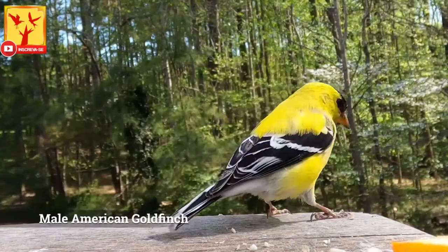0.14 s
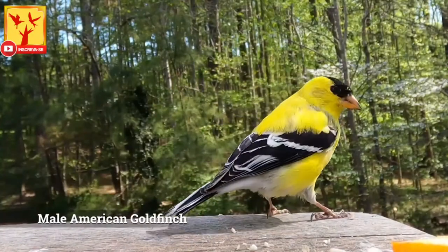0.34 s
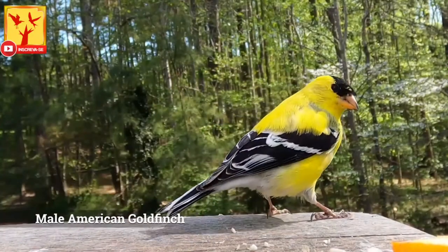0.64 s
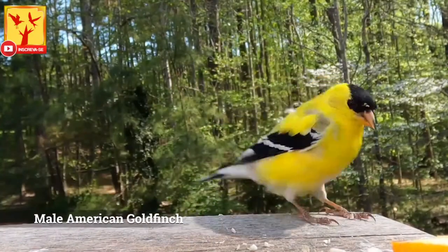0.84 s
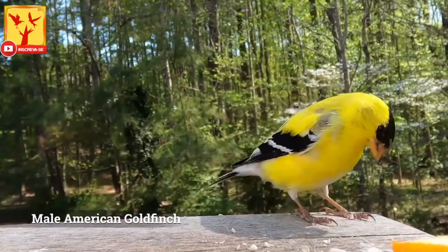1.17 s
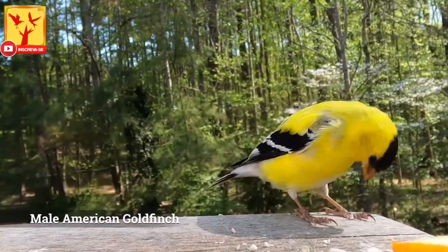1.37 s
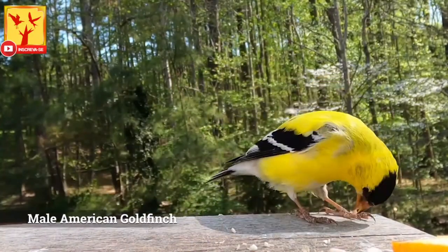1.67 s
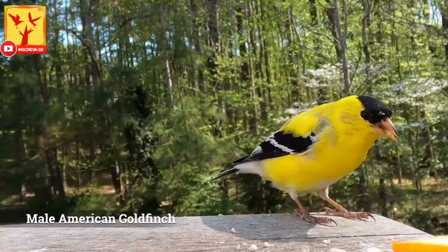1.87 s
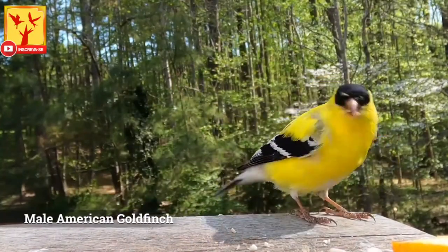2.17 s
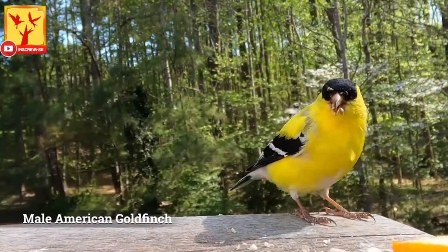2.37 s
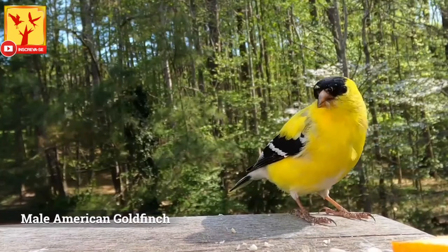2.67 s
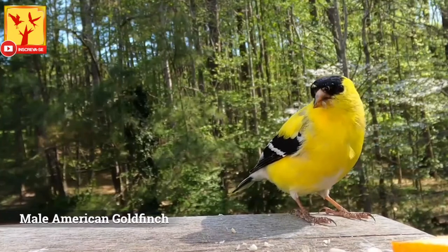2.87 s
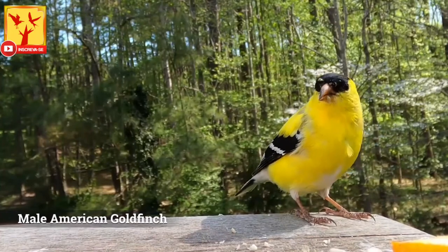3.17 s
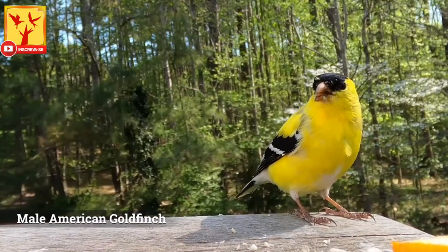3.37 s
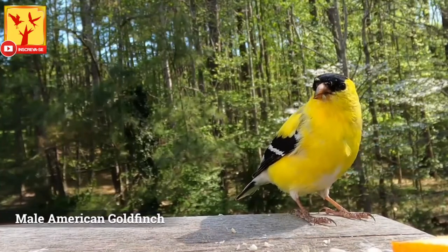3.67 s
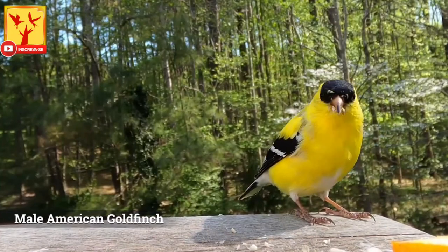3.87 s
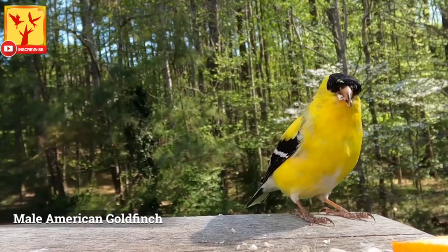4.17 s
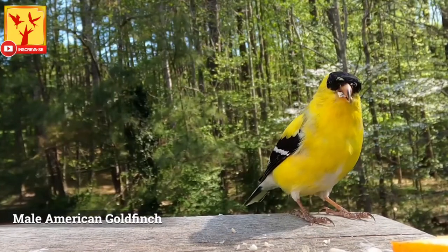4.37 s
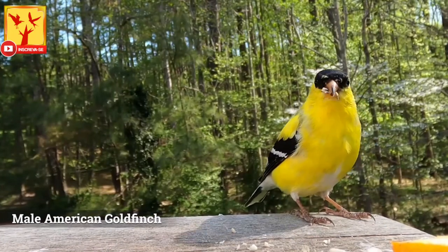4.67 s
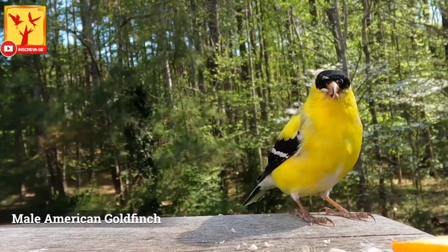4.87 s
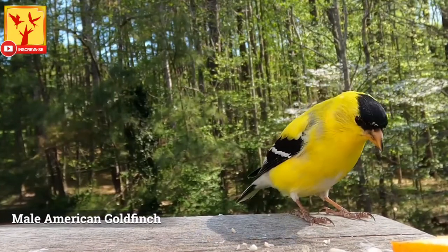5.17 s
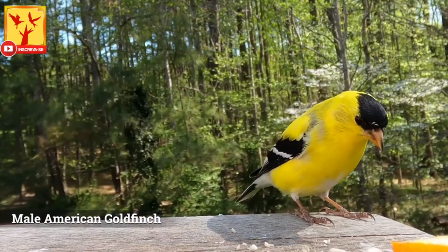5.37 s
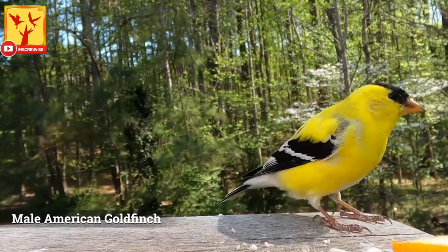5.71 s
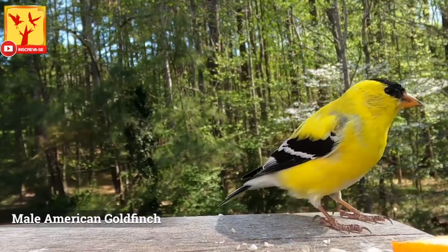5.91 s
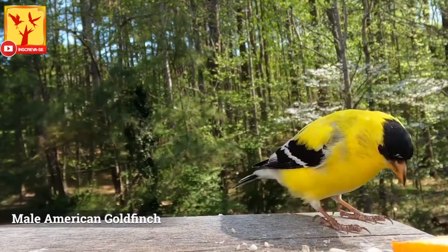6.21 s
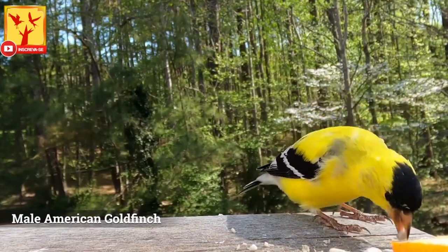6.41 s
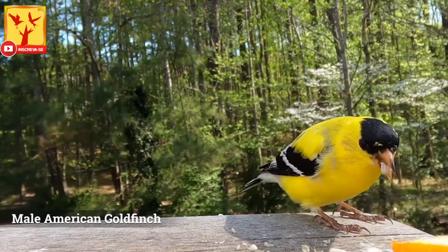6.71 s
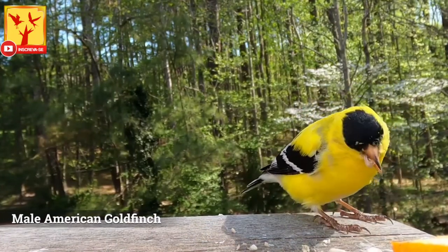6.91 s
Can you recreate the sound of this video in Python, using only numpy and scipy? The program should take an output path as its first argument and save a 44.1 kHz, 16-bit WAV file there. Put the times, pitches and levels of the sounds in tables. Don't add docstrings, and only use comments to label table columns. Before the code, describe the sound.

A quiet outdoor bed of low rumble, distant road and soft leaf hiss, nearly mono at first. Small dry claw taps fall near 0, 0.3 and 0.4 s, with a stronger one at 1 s. Thin, wavering high whistles come from the woods from 0.3 to 1.2 s as a faint tyre hum passes, nearest around 1 s. Low whistles climb at 1.7 and 2.5 s while stereo opens. Hollow wooden knocks sound at 2.6 and 2.8 s; the breeze freshens at 3 s and a low engine drone strengthens unevenly. Taps cluster at 3.1 and 3.45 s with rasping calls. At 3.7 s a buzz falls into a rapid trill until 4.3 s, with wing-beat thumps strongest at 4.2 s, left-heavy, and a brief squeak. A pure slur rises at 4.6 s, a sharp left chip at 5.1 s. Knocks at 5.7 s, light taps and faint rasps end near 7 s over the drone.

```python
import sys
import numpy as np
from scipy import signal
from scipy.fft import rfft, irfft, next_fast_len
from scipy.io import wavfile
from scipy.ndimage import uniform_filter1d, map_coordinates

SR = 44100
rng = np.random.default_rng(int(sys.argv[2]) if len(sys.argv) > 2 else 0)


def store_wav(level_fs):
    pcm = np.round(np.clip(np.atleast_2d(level_fs), -1, 1) * 32767)
    wavfile.write(sys.argv[1], SR, pcm.T.astype(np.int16))


def decibels_to_gain(level_db):
    exponent = np.asarray(level_db, float) / 20
    return 10 ** exponent


N = 310905
TIME = np.arange(N) / SR
FRESHENED = TIME > 2.98


def unit(x):
    return x / np.sqrt(np.mean(x ** 2) + 1e-20)


def along(points, hz):
    f, v = np.transpose(points)
    return np.interp(np.log(hz + 1), np.log(f + 1), v)


def curves(rows):
    s, *cols = np.transpose(rows)
    return [np.interp(TIME, s, c) for c in cols]


def gate(rows, edge_s):
    return np.clip(np.minimum(TIME - rows[0][0], rows[-1][0] - TIME) / edge_s, 0, 1)


def wobble(rate):
    knots = rng.standard_normal(int(N * rate / SR) + 4)
    return map_coordinates(knots, [TIME * rate])


def tone(hz):
    return np.sqrt(2) * np.sin(2 * np.pi * np.cumsum(hz) / SR)


def sides(pan_db):
    pair = decibels_to_gain(np.array([[pan_db / 2], [-pan_db / 2]]))
    return pair / pair.mean()


def filtered(x, response):
    m = next_fast_len(N + SR // 2)
    return irfft(rfft(x, m) * response(np.fft.rfftfreq(m, 1 / SR)), m)[..., :N]


def rush(spectrum, alike, patchy_db):
    z = signal.stft(rng.standard_normal((2, N)), nperseg=512)[2]
    field = uniform_filter1d(rng.standard_normal(z.shape[1:]), size=6, axis=0)
    field = uniform_filter1d(field, size=14, axis=1)
    pair = signal.istft(z * decibels_to_gain(patchy_db * unit(field)), nperseg=512)[1][:, :N]

    def shares(hz):
        turn = np.arccos(np.clip(along(alike, hz), -1, 1)) / 2
        return decibels_to_gain(along(spectrum, hz)) * [np.cos(turn), np.sin(turn)]

    mid, side = filtered(pair, shares)
    return unit(np.array([mid + side, mid - side]))


def flutter(rows, rate_hz, rough, lean_hz=150):
    hz, db, swing = curves(rows)
    beat = tone(rate_hz * (1 + rough * wobble(40))) / np.sqrt(2)
    swing = swing * (1 + 3 * rough * wobble(150))
    return gate(rows, 0.0023) * decibels_to_gain(db - swing / lean_hz * beat) * tone(hz + swing * beat)


def slur(s, length, start_hz, end_hz, bend, overtone_db, rough_db, late):
    u = np.clip((TIME - s) / length, 0, 1)
    hz = end_hz + (start_hz - end_hz) * (1 - u) ** bend
    overtone = decibels_to_gain(overtone_db + 2.5 * rough_db * wobble(300)) * tone(2 * hz)
    arch = np.sin(np.pi * u ** late) ** .7
    return arch * (decibels_to_gain(rough_db * wobble(900)) * tone(hz) + overtone)


def wood(x):
    # (frequency [Hz], time to fall 60 dB [s])
    decay = [(1500, 1.3), (4000, 1.01), (8000, 0.23)]
    hz, t, z = signal.stft(rng.standard_normal((2, SR)), SR, nperseg=256)
    tail = signal.istft(z * decibels_to_gain(-60 * t / along(decay, hz)[:, None]), SR, nperseg=256)[1]
    tail = tail + .3 * tail[::-1]
    return signal.fftconvolve(x[None], tail / np.linalg.norm(tail[0]), axes=1)[:, :N]


def taps():
    # (time [s], peak [dB], knock [dB], left minus right [dB])
    contacts = [(0.0177, -54, 13, -6), (0.255, -55, 14, -12), (0.4046, -60, 2, -8.5), (1.027, -44, 11.5, 3),
                (1.8796, -60.5, 12, -11), (2.213, -56, 1, 12), (2.586, -68, 24, 3), (2.794, -50, -7, 6),
                (3.0385, -57, 10, -9), (3.048, -47.5, -2, 11), (3.114, -41.5, 3.5, 19),
                (3.1238, -45, 10, 2), (3.1419, -49, 9, 15), (3.597, -63, 23.5, 2), (3.4324, -48.5, 17, 5),
                (3.454, -44, 17, 12), (3.463, -52, 17.5, 4), (3.517, -55, -11, 6), (3.860, -52, -18.5, 1),
                (4.006, -47.5, 6, 14), (4.0247, -45, 5.5, 9.5), (4.065, -48.5, 3.5, 18), (4.107, -51, 0, 8),
                (4.779, -57, 2, 2.5), (5.7158, -48.5, 10, 0), (5.736, -52.5, 14, 7), (6.64, -63, 5, 2),
                (6.764, -50.5, -27, 10), (6.8794, -62, -3, 18), (1.752, -66, 0, 2), (2.185, -66, 0, 2),
                (3.2475, -64, 0, 4), (3.2745, -60, -1, 2), (4.717, -64, 0, 3), (4.845, -62, 0.5, 1),
                (4.9097, -63, 0, 3), (5.085, -51, -1, 11), (5.3428, -61, 1, 1), (6.759, -57, -12, 8)]
    # (frequency [Hz], level [dB per Hz])
    crack_spectrum = [(800, -40), (1800, -8), (3600, 0), (4500, -5), (8000, -14), (9500, -29), (12500, -42),
                      (15000, -70)]
    # (frequency [Hz], width [Hz], level [dB])
    rail_modes = [(430, 91, -11.5), (798, 91, 1.5), (1054, 90, -3.5), (1470, 130, -5)]
    rise_s = 0.0032
    crack, knock = np.zeros((2, N + SR)), np.zeros(N + SR)
    t = np.arange(SR // 10) / SR
    u = t / rise_s
    for s, db, knock_db, pan_db in contacts:
        burst = decibels_to_gain(db + 6.0) * u * np.exp(-u) * rng.standard_normal((2, len(t)))
        scuff = burst[0] + 0.2 * burst[1] * [[1], [-1]]
        crack[:, round(s * SR):][:, :len(t)] += scuff * sides(pan_db)
        knock[round(s * SR):][:len(t)] += decibels_to_gain(knock_db) * burst[1]

    def rail(f):
        total = 0
        for k, (centre, width, db) in enumerate(rail_modes):
            damping = 1j * f * width
            total = total + (-1) ** k * decibels_to_gain(db) * damping / (centre * centre - f * f + damping)
        return total / (1 + 1j * f / 2500) ** 3

    scuffs = filtered(crack[:, :N], lambda hz: decibels_to_gain(along(crack_spectrum, hz)))
    return decibels_to_gain(5.5) * scuffs + decibels_to_gain(13.5) * filtered(knock[:N], rail) * sides(pan_db=-17.0)


def knocks():
    # (time [s], peak [dB], pitch [Hz], time to fall 60 dB [s])
    blows = [(2.5867, -42, 1330, 0.036), (2.587, -42.5, 410, 0.072), (2.821, -45.5, 1500, .03),
             (3.455, -43, 810, 0.066), (5.718, -50.5, 760, 0.056), (5.739, -48.5, 420, .05),
             (1.03, -50, 1100, .05), (4.3, -51, 2600, 0.054), (5.716, -59.5, 2050, .03),
             (2.4, -54, 2600, .02), (2.8, -53, 4000, 0.028)]
    out = 0
    for s, db, hz, t60 in blows:
        decay = decibels_to_gain(db - 60 * np.clip(TIME - s, 0, None) / t60) * (TIME > s)
        out = out + decay * np.sin(2 * np.pi * hz * (s - TIME))
    return out


def puffs():
    # (time [s], left level [dB], pitch
    # [Hz], right level [dB])
    eddies = [(4.021, -16, 64.6, -18.5), (4.054, -25, 110, -30), (4.065, -20.5, 72, -23),
              (4.054, -31.5, 290, -36), (4.093, -30.5, 238, -34), (4.103, -22.5, 90.5, -22),
              (4.134, -31, 239, -33.5), (4.146, -18, 60, -25.5), (4.160, -23, 266, -19),
              (4.167, -12, 105, -26), (4.159, -7, 96, -26), (4.171, -12.5, 156, -17),
              (4.185, -13.5, 98, -23), (4.195, -14, 250, -14.5), (4.2, -26, 300, -19),
              (4.204, -15, 146, -16), (4.22, -18, 134, -42), (4.221, -31.5, 257, -26),
              (4.21, -23.5, 48, -30), (4.226, -27, 65, -25), (4.244, -18, 69.7, -25), (4.282, -22, 60, -36),
              (2.592, -38, 330, -43), (3.595, -37, 330, -39), (6.3, -23, 40.6, -49)]
    out = 0
    for s, left_db, hz, right_db in eddies:
        u = np.clip((TIME - s) * hz / 1.41, 0, 1)
        lag = 1.5 * (s > 4.14)
        push = np.sin(2.6 * np.pi * u - [[0], [lag]]) + .06 * np.sin(7.5 * np.pi * u)
        out = out + decibels_to_gain([[left_db], [right_db]]) * np.sin(np.pi * u) ** 2 * push
    return out


def chips():
    # (time [s], start [Hz], end [Hz], level [dB])
    falls = [
        (2.788, 8900, 7680, -61),
        (3.591, 9330, 8010, -55),
        (5.069, 9400, 7630, -37),
    ]
    nearest_db = -36.5
    out = 0
    for s, start_hz, end_hz, db in falls:
        note = slur(s, 0.028, start_hz, end_hz, bend=3.3, overtone_db=-25, rough_db=1.5, late=1.97)
        note = decibels_to_gain(db) * note
        near_echo = decibels_to_gain(-24) * np.roll(note, round(0.023 * SR))
        far_db = nearest_db - db
        wet = decibels_to_gain(-23 + 0.74 * far_db) * wood(note)
        out = out + (note + near_echo + wet) * sides(29 - .45 * far_db)
    return out


def singer():
    # (time [s], centre [Hz], level [dB], swing [Hz])
    buzz = [
        (3.69, 5540, -68.5, 1),
        (3.715, 5520, -54.5, 4.2),
        (3.732, 5580, -41.5, 50),
        (3.76, 5540, -41, 490),
        (3.775, 5627, -43, 550),
        (3.795, 5150, -41.5, 550),
        (3.82, 4580, -39, 440),
        (3.843, 3950, -37, 200),
        (3.856, 3360, -34, 20),
        (3.864, 3040, -44, 10),
    ]
    song = flutter(buzz, rate_hz=193, rough=0.061, lean_hz=250) + trill()
    effort = np.sqrt(abs(uniform_filter1d(song * song, size=300)))
    octave = decibels_to_gain(-44.5) * song * song / (effort + 1e-4)
    hiss = decibels_to_gain(-43.0 + 4 * wobble(27)) * effort * rng.standard_normal(N)
    return song + filtered(octave + hiss, lambda hz: hz > 7200)


def trill():
    # (time [s], level [dB])
    effort = [
        (3.85, -43.5),
        (3.875, -30.5),
        (4.19, -35.5),
        (4.275, -43.5),
        (4.3, -51),
    ]
    strokes_db = [0, 0.5, -0.5, 0.5, 0.5, 0.5, 2.5, -1, -0.5, 4, -1.5, -3, -3, 1, -2.5, -3, -1, -4.5]
    # (time [s], level [dB])
    low_fade = [
        (4.1, 0.5),
        (4.2, -7.5),
    ]
    k = np.arange(18)
    gaps_s = np.minimum(.022 + .001 * k, .0272)
    s = 3.852 + np.cumsum(gaps_s * (k > 0))
    size_db = np.interp(TIME, s, strokes_db)
    turn = np.interp(TIME, s, k) % 1
    unsteady = wobble(150)
    hz = np.interp(turn, [0, .2, .48, .56, .8, 1], [4370, 3620, 3260, 3720, 4000, 4370]) + 25 * unsteady
    stroke_db = np.interp(turn, [0, .17, .36, .53, .63, .8, 1], [-11, -15, -4.5, -18, -6, 0, -11])
    stroke_db = stroke_db + 1.2 * unsteady + curves(low_fade)[0] * (hz < 3600)
    level_db = curves(effort)[0] + size_db + uniform_filter1d(stroke_db, size=70)
    return gate(effort, 0.0072) * decibels_to_gain(level_db) * tone(uniform_filter1d(hz, size=70))


def slurs():
    # (time [s], length [s], start [Hz], end [Hz])
    squeak = (4.137, .038, 1175, 860)
    # (order [1], level [dB], lateness [1])
    orders = [(3, -43, 0.42), (4, -41.5, 1.9), (6, -53.5, 1.1), (7, -64, 1.3), (8, -68, .7), (9, -73, 1.3)]
    # (frequency [Hz], half width [Hz], gain [dB])
    throat = (3950, 260, 9.9)
    # (time [s], length [s], start [Hz], end [Hz])
    rise = (4.568, .061, 2560, 3760)
    s, length, start_hz, end_hz = squeak
    fall = 0
    for k, db, late in orders:
        fall = fall + decibels_to_gain(db) * slur(s, length, k * start_hz, k * end_hz, bend=0.99,
                                     overtone_db=-67.5, rough_db=3.5, late=late)
    centre, width, gain_db = throat
    fall = filtered(fall, lambda f: 1 + decibels_to_gain(gain_db) / (1 + ((f - centre) / width) ** 2))
    return fall + decibels_to_gain(-48) * slur(*rise, bend=.75, overtone_db=-24, rough_db=1.2, late=2.8)


def rasps():
    # (time [s], length [s], centre [Hz], level [dB], swing [Hz])
    calls = [(3.402, .185, 2730, -44.5, 320), (3.428, .042, 3600, -50, 300), (2.69, .14, 3900, -63, 400),
             (3.51, .17, 3850, -60, 350), (.67, .03, 4230, -65, 200), (3.06, .27, 3750, -62, 400),
             (2.89, .2, 2650, -63, 150), (3.72, .26, 2620, -61, 150), (4.19, .14, 2550, -63, 150),
             (6.52, .14, 6000, -68, 350), (6.85, .14, 6000, -67, 350)]
    out = 0
    for s, length, hz, db, swing_hz in calls:
        edge_db = db - 5
        rows = [(s, hz, edge_db, swing_hz), (s + .55 * length, hz, db, swing_hz),
                (s + length, hz, edge_db, swing_hz)]
        out = out + flutter(rows, rate_hz=102, rough=0.06, lean_hz=900)
    return out


def whistles(notes, flicker_db, waver_hz, blur=0.22):
    glide_power = 3.5
    out, waver = 0, waver_hz * (wobble(70) + blur * wobble(300))
    for s, length, start_hz, end_hz, db in notes:
        u = np.clip((TIME - s) / length, 0, 1)
        hz = ((1 - u) / start_hz ** glide_power + u / end_hz ** glide_power) ** (-1 / glide_power)
        arch = abs(np.sin(np.pi * u)) ** 0.28 * (u < 1)
        out = out + decibels_to_gain(db) * arch * tone(hz + waver)
    return out * decibels_to_gain(flicker_db * (wobble(40) + wobble(160)))


def far_whistles():
    # (time [s], length [s], start [Hz], end [Hz], level [dB])
    thin_notes = [(.265, .06, 4270, 4250, -70), (.325, .065, 4260, 4260, -67),
                  (.395, .095, 4270, 4210, -66), (.47, .055, 4200, 4380, -67), (.525, .06, 4240, 4300, -76),
                  (.58, .15, 4410, 4140, -63), (.72, .09, 4240, 4200, -80), (.91, .07, 4540, 4520, -68),
                  (.96, .12, 4500, 4300, -61), (1.065, .055, 4300, 4620, -61), (1.1, .08, 4600, 4720, -64),
                  (1.07, .07, 4770, 4740, -74)]
    # (time [s], length [s], start [Hz], end [Hz], level [dB])
    faint_notes = [(.36, .1, 6500, 6720, -75), (.61, .076, 7160, 7750, -75), (.86, .225, 7200, 4770, -77),
                   (.93, .16, 5600, 4740, -75), (1.55, .036, 7700, 7600, -74),
                   (1.575, .032, 7500, 7000, -70), (2.04, .098, 6200, 6170, -78),
                   (2.12, .24, 6060, 9200, -80), (2.22, .033, 4330, 4100, -71),
                   (3.06, .24, 5900, 5900, -78), (3.325, .035, 2570, 2580, -60),
                   (3.36, .098, 6900, 6460, -78), (4.598, .021, 5750, 6000, -69),
                   (5.53, .022, 3900, 3900, -66), (6.5, .37, 3460, 3580, -69)]
    # (time [s], length [s], start [Hz], end [Hz], level [dB])
    climbs = [
        (1.67, 0.17, 1650, 1800, -65.5),
        (1.84, .09, 1867, 1940, -67.5),
        (1.92, 0.099, 1940, 1927, -72.5),
        (2.5, 0.14, 1528, 1787, -64),
        (2.62, 0.1, 1756, 1880, -64.5),
        (2.7, 0.092, 1874, 1970, -62),
        (2.8, .075, 1923, 1910, -65),
    ]
    # (time [s], length [s], start [Hz],
    # end [Hz], level [dB])
    steady = [(2.47, .16, 4880, 4880, -66), (2.638, .138, 4890, 4930, -68), (2.81, .065, 4990, 4960, -67),
              (2.88, .04, 4960, 4950, -79), (2.935, .05, 4950, 4940, -80), (3.585, .1, 2790, 2770, -62),
              (3.36, .045, 2720, 2750, -62), (2.43, .032, 5600, 5700, -77), (2.975, .025, 5550, 5980, -76),
              (2.997, .065, 5960, 6050, -76), (4.572, .028, 5180, 5900, -73), (5.58, .035, 3170, 3180, -69),
              (5.655, .025, 3180, 3180, -72), (5.72, .07, 3180, 3180, -73), (6.22, .21, 2830, 2845, -73)]
    # (time [s], length [s], level [dB])
    pip_rows = [
        (0.126, 0.072, -75),
        (.222, .022, -79),
        (.285, .065, -81),
        (.43, .055, -77),
        (0.55, .035, -78),
        (.595, .03, -82),
        (.69, .045, -84),
        (.76, .08, -85),
        (.885, .06, -84),
    ]
    pips = [(s, length, 5080, 5080, db) for s, length, db in pip_rows]
    thin = whistles(thin_notes, flicker_db=3.2, waver_hz=28)
    thin = thin + whistles(climbs + steady + pips, flicker_db=2.6, waver_hz=14)
    faint = whistles(faint_notes, flicker_db=3.5, waver_hz=35, blur=1.2)
    return thin + decibels_to_gain(-15) * wood(thin) + decibels_to_gain(-7) * faint + decibels_to_gain(-14) * wood(faint)


def drone():
    # (time [s], level [dB])
    carried = [(0, -59.5), (1.53, -49), (2.26, -51.5), (2.43, -41), (2.9, -49), (3.08, -37), (3.34, -38.5),
               (3.69, -32.5), (3.95, -37.5), (4.26, -36), (4.5, -28.5), (4.8, -29), (5.25, -36.5),
               (5.48, -26), (5.85, -38), (5.96, -55.5), (6.16, -27.5), (6.4, -33)]
    db, = curves(carried)
    hz = 88.6 - 1.35 * np.clip(TIME - 2.2, 0, None) + 0.39 * wobble(2.97)
    octave = decibels_to_gain(-60.5 + 5 * FRESHENED) * wobble(22) * tone(2 * hz)
    flicker_db = 0.39 * np.clip(-40 - db, 0, 12) * wobble(8.1)
    return decibels_to_gain(db + flicker_db + 1.5 * wobble(25)) * tone(hz) + octave


def passing():
    # (time [s], level [dB])
    hum_level = [
        (.3, -85),
        (.6, -57),
        (1.0, -52.5),
        (1.5, -60.5),
        (2.0, -75),
    ]
    hum = filtered(rng.standard_normal(N), lambda f: 1 / (1 + ((f - 480) / 90) ** 2))
    return gate(hum_level, 0.078) * decibels_to_gain(curves(hum_level)[0]) * unit(hum)


def background():
    # (time [s], level [dB])
    breeze = [(0, 1), (.55, 0), (.9, 2), (1.6, 0.5), (2.4, -.5), (2.85, 3.5), (3.35, 1.5), (3.65, 2.5),
              (4.3, -1), (4.8, -1.5), (5.4, 2.5), (6.05, -1.5), (6.3, 0.5), (7.05, -0.5)]
    # (time [s], rumble gain [dB], spread [s])
    gusts = [
        (3.36, 7, .25),
        (4.05, 8, .08),
        (4.22, 22, .08),
        (5.4, 3, .3),
        (6.3, 9, .12),
    ]
    # (frequency [Hz], level [dB per Hz])
    rumble_spectrum = [(11, -29.5), (18, -2.5), (59, 6), (86, -9), (104, -17), (130, -2.5), (183, -11.5),
                       (300, -28), (390, -53), (660, -120)]
    road_spectrum = [(59, -26), (100, -7.5), (113, -15), (173, -22), (246, -21.5), (480, -24.5),
                     (783, -26.5), (1370, -25.5), (2600, -49), (3380, -75), (5720, -120)]
    leaf_spectrum = [(1060, -10.5), (1800, -3.5), (2440, -5.5), (3000, -9), (3260, -6.5), (4450, -12.5),
                     (5020, -19), (6340, -23), (7000, -28.5), (9760, -49.5), (12700, -80.5), (21500, -120)]
    # (frequency [Hz], coherence [1])
    alike = [(60, 0.79), (140, 1), (320, 0.94), (750, 0.82), (1730, 0.9), (4020, 0.3), (9310, 0.088)]
    breeze_db, = curves(breeze)
    gust_db = sum(db * np.exp(-abs(TIME - s) / spread) for s, db, spread in gusts)
    rumble = rush(rumble_spectrum, [(30, 0.29), (70, 0.64), (130, 1.0)], patchy_db=1.8)
    rumble = decibels_to_gain(-48.5 + gust_db + 2.0 * wobble(7.5)) * rumble * sides(pan_db=-2.0)
    road = decibels_to_gain(-51 + breeze_db + 0.25 * wobble(5.0)) * rush(road_spectrum, alike, patchy_db=1.7)
    leaves_db = -68 + 0.67 * breeze_db + 4.5 * FRESHENED
    return rumble + road + decibels_to_gain(leaves_db) * rush(leaf_spectrum, alike, patchy_db=2.5)


def ports(x, lead):
    # (frequency [Hz], left minus right [dB])
    louder = [(60, 4), (110, -0.5), (180, 1.5), (320, 0), (560, 1), (990, 2), (1730, 4), (3030, 8.5),
              (5320, 0), (9310, 7)]

    def pair(hz):
        half = decibels_to_gain(along(louder, hz) / 2) * np.exp(.5j * along(lead, hz))
        return np.array([half, 1 / half]) * 2 / abs(half + 1 / half)

    return filtered(x, pair)


def scene():
    # (frequency [Hz], left lead [rad])
    far_lead = [(900, -0.26), (1500, 1.24), (1900, 2), (2500, -2.5), (3300, -1.3), (4200, -2.1), (5000, 2),
                (6600, 2), (9000, 2.5)]
    # (frequency [Hz], left lead [rad])
    song_lead = [(2500, -1.2), (3400, -.7), (4300, .4), (5200, .6), (7000, .5)]
    near = taps() + knocks_and_far(far_lead) + puffs() + chips()
    song, glides = singer(), slurs()
    birds = song * sides(pan_db=-2.5) + decibels_to_gain(-8) * wood(song)
    birds = birds + glides * sides(pan_db=-1.0) + decibels_to_gain(-17) * wood(glides)
    return near + ports(birds, song_lead)


def knocks_and_far(lead):
    rasping = rasps()
    far = far_whistles() + decibels_to_gain(-5) * rasping + decibels_to_gain(-11) * wood(rasping)
    return ports(knocks() + far + drone() + passing() + background(), lead)


def low_pass(x):
    return signal.sosfilt(signal.butter(12, 12400, fs=SR, output="sos"), x)


def record(dry):
    # (time [s], side level [dB])
    width = [
        (0, -56),
        (1.35, -40),
        (1.5, -26.5),
        (2.0, -13),
        (2.7, -7),
        (3.3, -4),
        (4.0, -0.5),
    ]
    mid = (dry[0] + dry[1]) / 2
    side = decibels_to_gain(curves(width)[0]) * (dry[0] - dry[1]) / 2
    return low_pass(np.array([mid + side, mid - side]))


dry = scene()
out = record(dry)
store_wav(out)
```